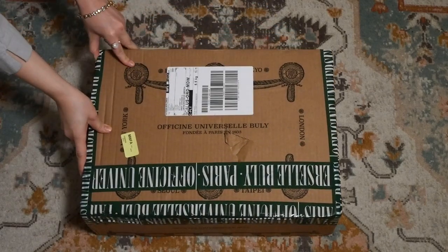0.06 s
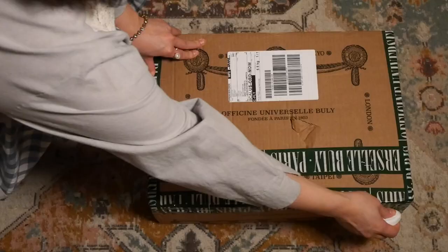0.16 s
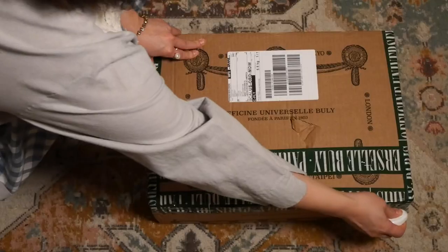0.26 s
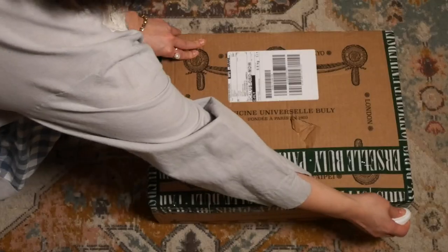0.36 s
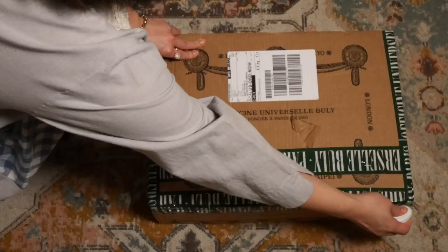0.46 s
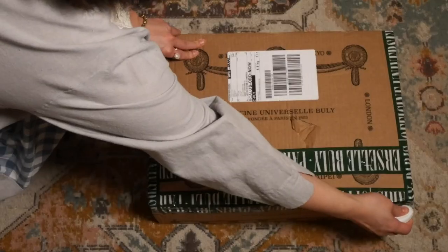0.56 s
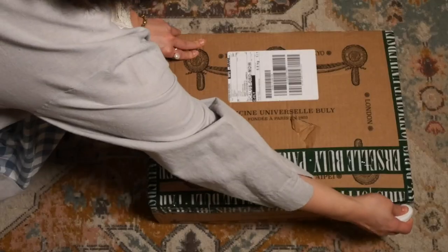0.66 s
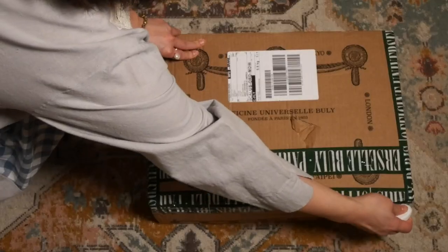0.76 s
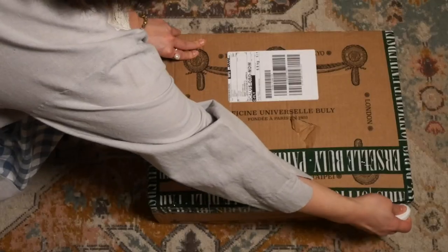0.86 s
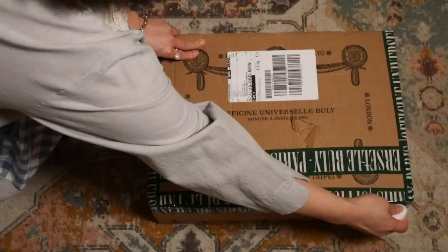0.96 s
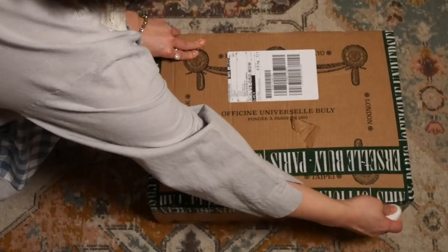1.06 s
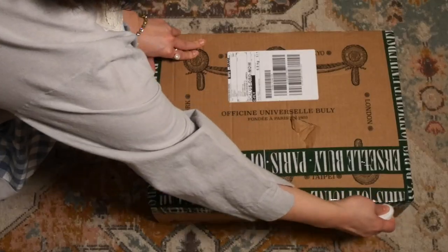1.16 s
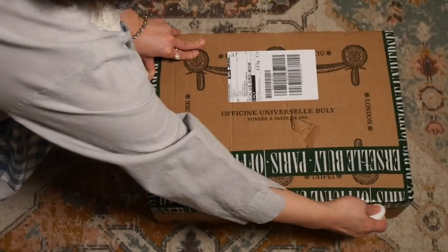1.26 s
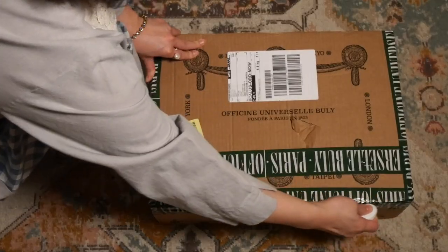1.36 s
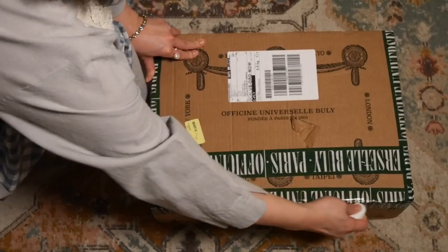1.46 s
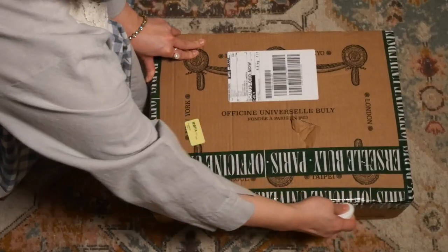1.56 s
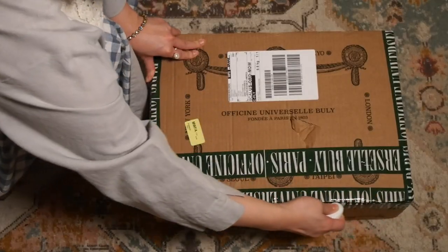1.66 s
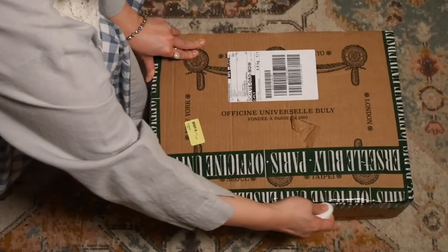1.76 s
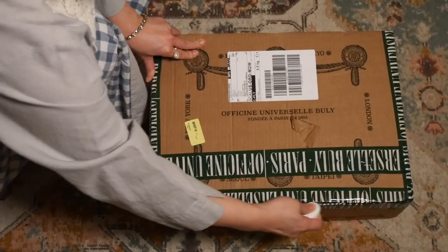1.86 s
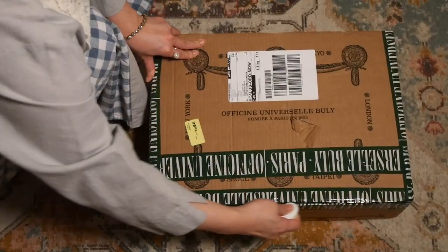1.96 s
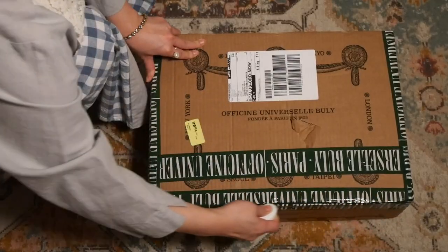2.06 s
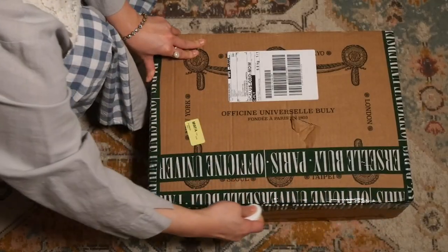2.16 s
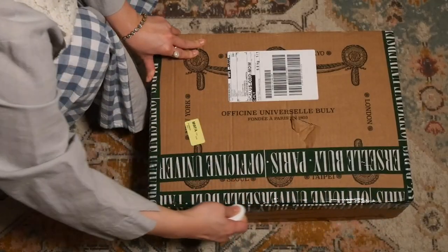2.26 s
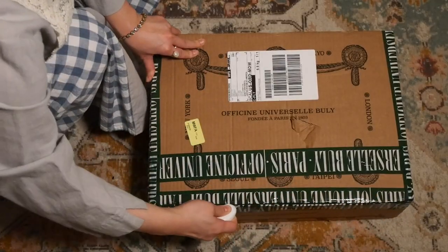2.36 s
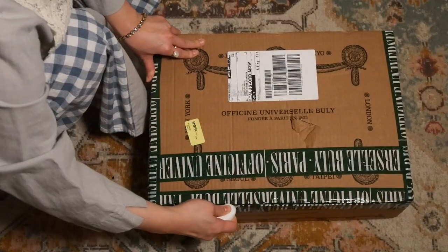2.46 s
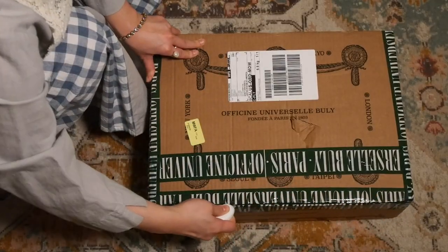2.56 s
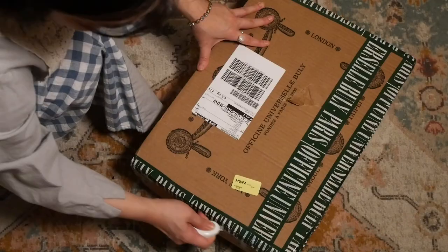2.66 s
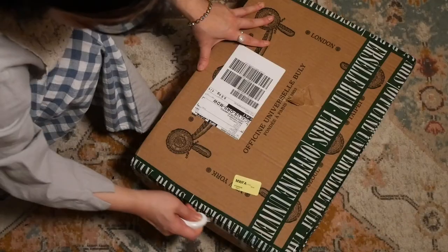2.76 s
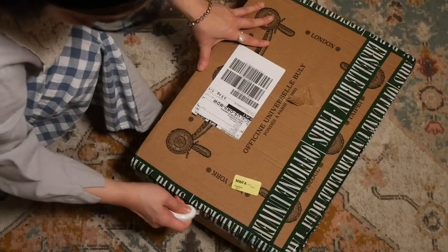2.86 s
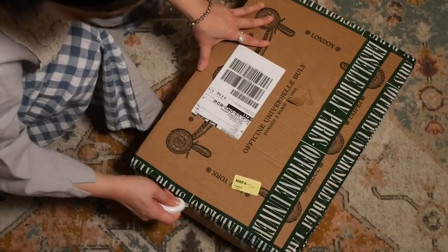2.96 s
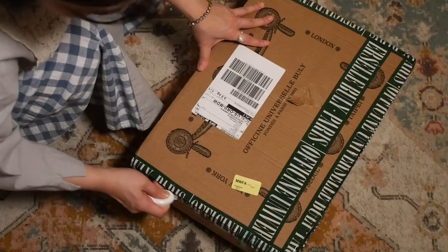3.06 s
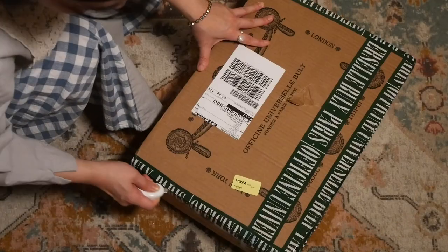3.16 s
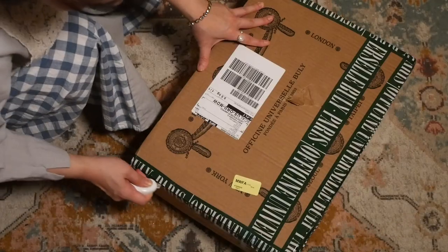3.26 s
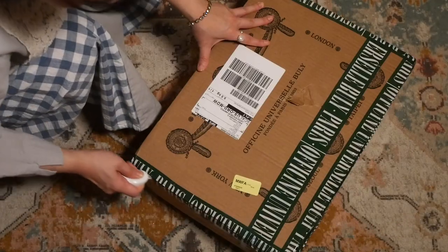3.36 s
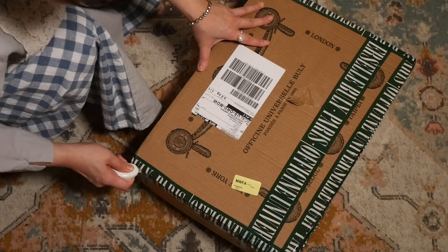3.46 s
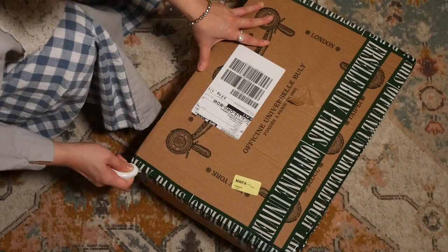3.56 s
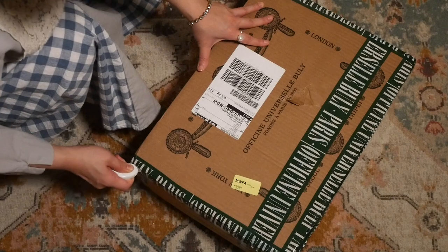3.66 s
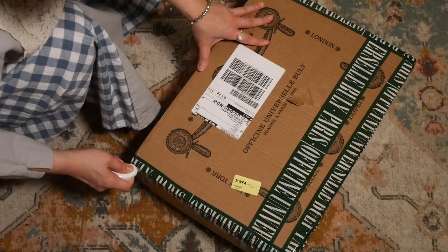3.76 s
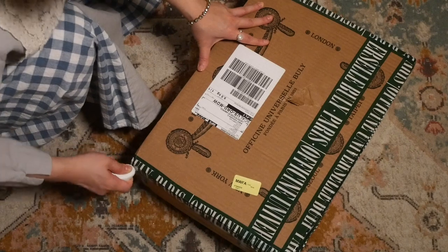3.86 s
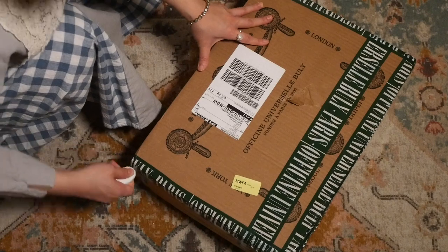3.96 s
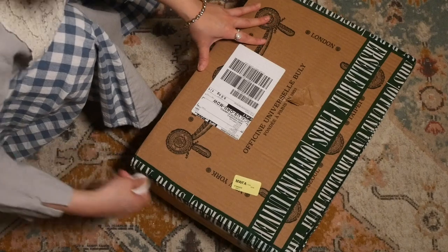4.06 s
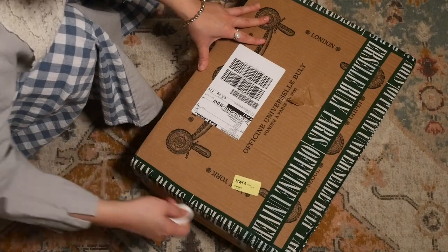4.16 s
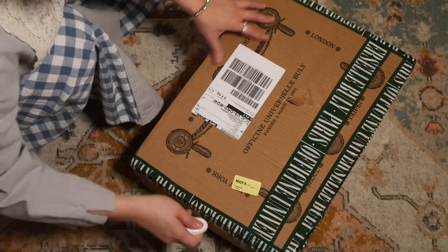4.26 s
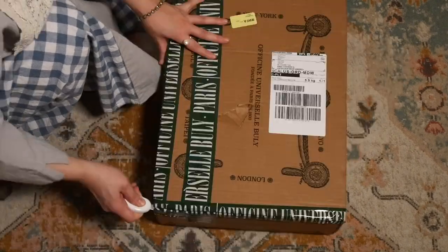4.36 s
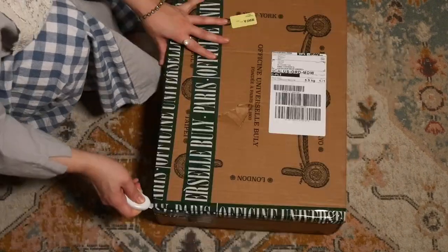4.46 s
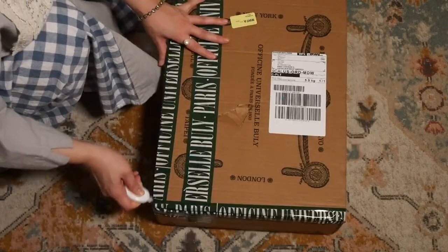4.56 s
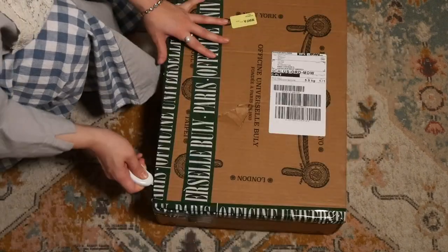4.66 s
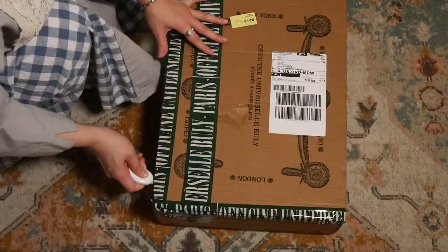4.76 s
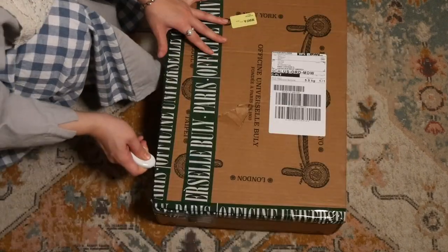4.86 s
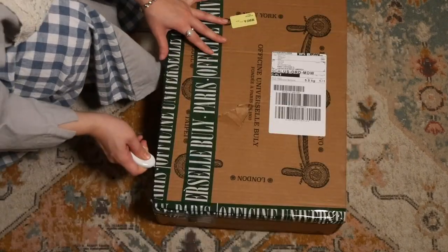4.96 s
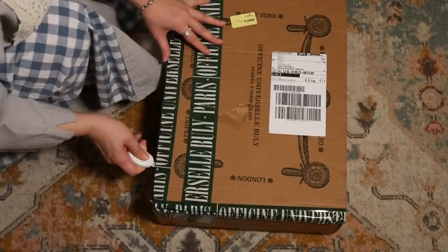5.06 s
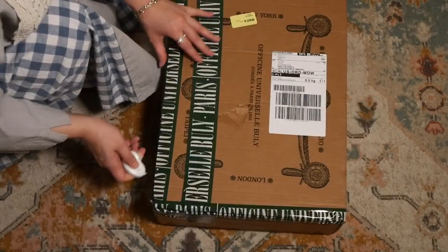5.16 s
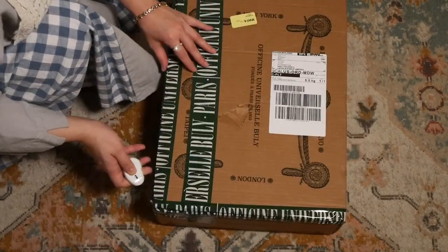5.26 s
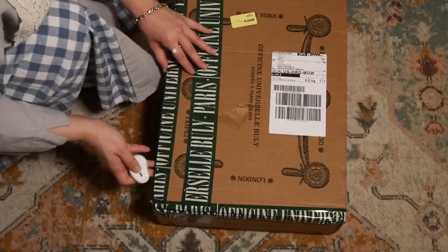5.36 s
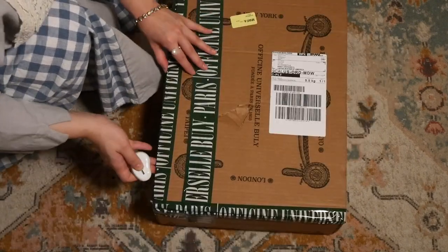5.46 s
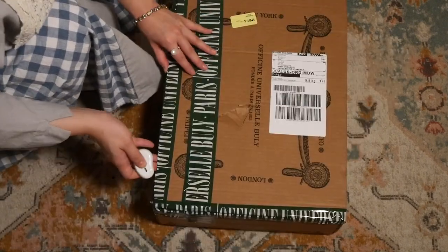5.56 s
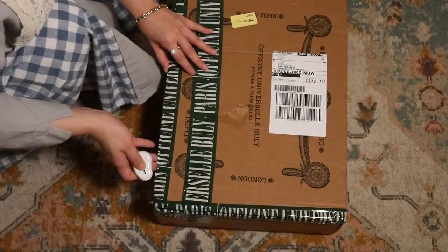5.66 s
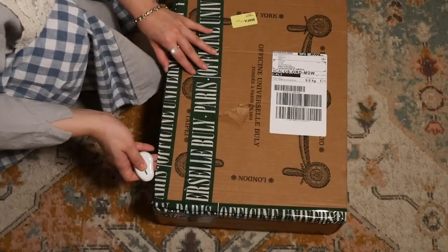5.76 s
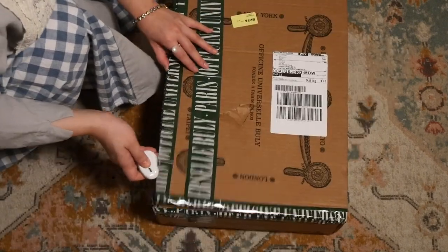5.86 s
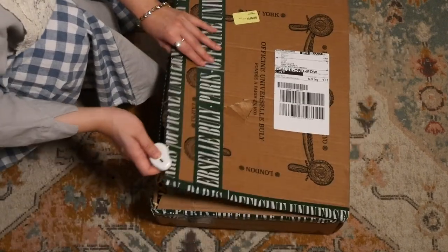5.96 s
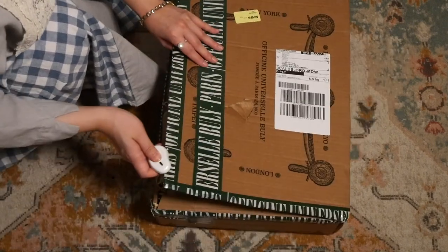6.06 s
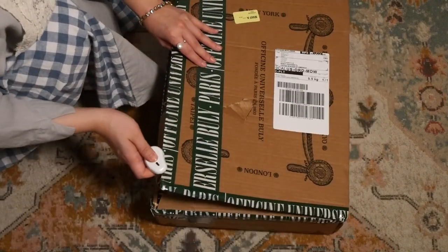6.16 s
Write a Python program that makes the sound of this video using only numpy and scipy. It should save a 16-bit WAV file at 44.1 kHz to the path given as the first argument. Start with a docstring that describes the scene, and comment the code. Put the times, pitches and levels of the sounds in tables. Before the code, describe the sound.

A small blade scrapes and rips along packing tape on a cardboard box, then the lid tears free with crunches and one loud knock.

```python
"""A small cutter slits the tape of a cardboard box in a room: broadband strokes, band-passed bursts, ringing modes.
Over a quiet hush, hands slide on the board, with a soft knock and scuffs. The blade scores and runs along the front
in dense random ticks, over flutes, with droning panels and ringing film; then the corner, one long side pull and
short pushes. A sharp rip and a brush lead to two slashes through the back tape and some probing.
The lid tears free with crunches and a loud knock, then squeaks as it lifts."""
import sys
import numpy as np
from scipy import signal
from scipy.fft import rfft, irfft
from scipy.io import wavfile
from scipy.ndimage import uniform_filter1d

SR = 44100
rng = np.random.default_rng(int(sys.argv[2]) if len(sys.argv) > 2 else 0)


def unload_audio(sound):
    """Save the sound as a 16-bit wav file, at the path given as the first command line argument."""
    columns = np.transpose(np.atleast_2d(sound))
    # keep every value between -1 and 1, then stretch to whole-number steps
    steps = np.round(np.clip(columns, -1, 1) * 32767)
    wavfile.write(sys.argv[1], SR, steps.astype(np.int16))


N = 274302
TIME_S = np.arange(N) / SR

# strokes by place: start t/s, attack/s, hold/s, panel rumble level/dB, tape rasp level/dB
SLIDING_STROKES = [(0.0, 0.0043, 0.0086, -61, -60), (0.19, .1, .06, -53, -72),
                   (0.36, 0.025, .25, -59.5, -73), (0.65, 0.013, .27, -56, -74),
                   (0.7, 0.021, 0.032, -58, -59.5), (6.122, 0.0044, 0.028, -54, -42.5),
                   (6.175, 0.0068, 0.03, -53, -55)]  # hands and board slide over each other
ENTRY_STROKES = [(0.943, 0.0076, 0.1, -51, -58), (1.02, 0.072, 0.042, -43.5, -51.5),
                 (1.13, 0.013, .16, -42, -45.5), (1.3, 0.041, .11, -44, -44.5)]  # blade scores its way into the front tape
FRONT_STROKES = [(1.45, 0.043, 0.013, -34.5, -37), (1.505, 0.025, 0.39, -40.5, -40.5),
                 (1.862, 0.018, 0.02, -33, -38.5), (1.935, 0.0028, 0.047, -35.5, -40),
                 (2.004, 0.0045, 0.023, -35, -36), (2.04, .015, 0.07, -47, -49)]  # along the front edge, then tugs at its end
CORNER_STROKES = [(2.136, 0.0069, 0.018, -43, -46.5), (2.203, 0.0029, 0.015, -40, -42.5),
                  (2.309, .03, 0.015, -46, -40.5), (2.35, 0.013, 0.045, -49.5, -53),
                  (2.56, 0.047, .022, -46, -46.5)]  # picks its way round the corner
SIDE_STROKES = [(2.657, 0.0046, 0.594, -38, -34)]  # one long pull down the side
SHORT_STROKES = [(3.27, 0.022, 0.023, -45, -45), (3.32, 0.0045, 0.15, -36.5, -38),
                 (3.347, 0.0042, 0.01, -30, -31.5), (3.435, 0.007, 0.0087, -37, -39),
                 (3.64, 0.0039, 0.17, -67, -64.5), (3.701, .003, 0.061, -54.5, -72),
                 (3.792, .01, 0.047, -46.5, -44), (3.87, 0.013, 0.12, -59, -57.5),
                 (3.954, 0.016, 0.0089, -40.5, -40.5), (4.02, .02, .08, -59.5, -67)]  # short pushes at the far end of the side
BRUSH_STROKES = [(4.228, 0.023, 0.076, -52.5, -50.5)]  # flat of the cutter brushes the tape
BACK_STROKES = [(4.477, 0.023, .045, -46, -61), (4.548, .002, 0.037, -39.5, -44),
                (4.582, 0.034, 0.058, -31, -33), (4.68, 0.0097, 0.031, -38.5, -51),
                (4.789, .004, 0.028, -36.5, -40), (4.825, 0.034, .006, -32.5, -37)]  # two slashes through the back tape, with lead-ins
PROBING_STROKES = [(5.02, 0.022, 0.074, -61, -63), (5.107, .005, .125, -54.5, -58),
                   (5.48, 0.047, .11, -55, -66), (5.625, 0.016, 0.15, -46, -58),
                   (5.765, 0.0021, 0.023, -37, -43), (5.797, 0.032, 0.042, -33.5, -37.5)]  # blade feels for the last tape and levers the lid
LID_STROKES = [(5.858, 0.0025, 0.012, -16.5, -23), (5.885, 0.013, .006, -19.5, -22.5),
               (5.91, .01, .02, -23.5, -29), (5.969, 0.0024, 0.0044, -24.5, -30),
               (5.987, 0.0046, 0.012, -24, -32.5), (6.02, 0.016, 0.061, -45, -53)]  # lid tears free in a run of crunches

# spectra by place: f/Hz, relative density level/dB per Hz
HUSH_COLOUR = [(15, -61), (25, -12), (64, -7), (92, -10.5), (175, -6.5), (206, -10.5), (384, -3),
               (545, -13.5), (624, 0), (796, -16), (1070, -8.5), (1440, -19), (1560, -16.5), (2280, -21),
               (16000, -25.5)]  # quiet background
SLIDING_COLOUR = [(45, -26), (70, -28), (118, 11), (199, -8), (330, 6.5), (520, -1), (872, -10),
                  (1050, -12), (1500, -27), (3040, -30), (4480, -29), (6000, -32), (16000, -37.5)]
ENTRY_COLOUR = [(45, -43), (80, -20), (120, 3), (190, -15), (310, 1), (580, -3.5), (800, -3), (1200, -9),
                (1600, -15), (2430, -17.5), (5750, -17.5), (7500, -12), (10000, -19.5), (16000, -29)]
FRONT_COLOUR = [(41, -39), (70, -27), (124, 0), (223, -5.5), (385, -3.5), (431, -13.5), (506, -5),
                (797, -8.5), (1050, -10), (1930, -17), (2540, -15.5), (5620, -17), (7060, -12),
                (13600, -18.5), (16000, -22.5)]
CORNER_COLOUR = [(41, -70), (70, -35), (115, -15), (170, 1), (223, -13), (394, -3), (483, -4), (977, -7),
                 (1120, -7.5), (1980, -16), (6300, -9), (13000, -23), (16000, -29)]
SIDE_COLOUR = [(41, -65), (70, -29), (166, -8), (233, -16.5), (274, -7), (422, -3), (517, 1.5), (579, -4),
               (620, -4), (1340, -6), (1980, -21), (6300, -14.5), (8470, -21.5), (13300, -20),
               (16000, -30.5)]
SHORT_COLOUR = [(41, -74), (70, -18), (155, -3), (336, -3), (462, 5.5), (892, -1), (977, -7.5),
                (1120, -5.5), (1280, -11), (1580, -13), (2270, -22.5), (4910, -15.5), (8090, -22.5),
                (13000, -23.5), (16000, -34)]
BRUSH_COLOUR = [(59, -69), (100, -43), (174, -10), (202, -19), (283, -13), (365, -8), (406, -16),
                (524, -15.5), (872, -6.5), (970, -17), (2220, -15), (12900, -14), (16000, -24)]
BACK_COLOUR = [(41, -74), (70, -41), (113, 1), (239, -5.5), (394, 3), (955, -6), (1410, -14), (1650, -18.5),
               (2910, -24), (4690, -23), (5370, -26), (6020, -18.5), (8470, -27.5), (13300, -31),
               (16000, -49)]
PROBING_COLOUR = [(41, -42), (70, -26), (159, -2), (218, -13.5), (293, -9.5), (403, -6), (554, -3.5),
                  (934, -11.5), (1370, -12), (1650, -24.5), (2840, -20), (12700, -30.5), (16000, -41)]
LID_COLOUR = [(30, -15), (76, -29), (120, -8), (170, 1.5), (220, -5), (300, -12), (420, -3.5), (560, -7),
              (680, -8.5), (1100, -10), (2200, -14), (4300, -13), (8000, -21.5), (16000, -29.5)]

# resonances on those spectra: f/Hz, width/Hz, lift/dB (negative = notch)
HUSH_PEAKS = [(630, 45, 2.5), (1010, 39, 2.9), (6450, 1200, 3.1)]
SLIDING_PEAKS = [(670, 88, 3.7), (1083, 210, 14.8), (2200, 170, 10), (4330, 430, 1.7)]
FRONT_PEAKS = [(197, 9.3, -2.5), (1106, 140, 4), (2025, 28, 7.5), (5770, 350, -7), (7800, 300, -3),
               (10030, 480, 2.5)]
SIDE_PEAKS = [(167, 24, 1.4), (524, 96, 0.65), (1270, 510, 0.78), (4050, 410, 2.6), (6100, 160, 1)]
SHORT_PEAKS = [(173, 38, 6.1), (1140, 140, 3.4), (3600, 350, 2), (6160, 210, 2.4)]
BACK_PEAKS = [(178, 34, 9.1), (351, 24, 2), (404, 23, 1.7), (4930, 400, 4.2), (5870, 260, 5.9)]
LID_PEAKS = [(680, 36, 0.99), (1410, 90, 1.4), (2900, 88, 5.3), (6240, 230, 5.5)]

# knocks on the box: t/s, dry peak level/dB, upper band edge f/Hz
KNOCKS = [(0.283, -34, 456), (1.940, -33, 910), (1.982, -35, 890), (2.006, -29, 700), (2.073, -32, 707),
          (2.206, -36.5, 810), (3.353, -26, 222), (4.584, -27.5, 1200), (4.655, -25, 500),
          (4.864, -21, 540), (5.767, -26, 400), (5.860, -19.5, 980), (5.870, -10.5, 800), (5.896, -1, 900),
          (5.900, -10, 595), (5.971, -14, 910)]
# ringing modes of the box: f/Hz, width/Hz before the damping factor, mean relative level/dB
BOX_MODES = [(123.5, 6.6, -21), (170.2, 5.9, -13), (220, 24, -38), (273.5, 10.3, -1.5), (307, 45, 0),
             (388.5, 8.9, 0), (426, 130, 2.5), (522, 17, -2), (641, 21.5, 2), (677, 46, 7.5), (970, 39, 4),
             (977, 58, 0), (1358, 22, 4.5)]
# longer rips and scuffs of tape: t/s, dry peak level/dB, pitch f/Hz, crumbling time constant/s
RIPS = [(0.353, -47.5, 3020, 0.021), (0.711, -41, 4700, 0.0068), (0.806, -44, 4330, 0.0052),
        (1.883, -25, 2440, 0.018), (4.148, -36, 4640, 0.014), (4.154, -15.5, 6570, .0065),
        (4.160, -23, 8400, .013), (4.635, -22, 4660, 0.018), (5.297, -40.5, 3200, 0.0078),
        (5.922, -10, 3000, 0.0055), (5.991, -12.5, 1410, 0.0026)]
# clean snaps and blade ticks: t/s, dry peak level/dB, pitch f/Hz
SNAPS = [(0.951, -43, 4030), (0.977, -36.5, 4380), (1.207, -27.5, 6960), (1.941, -21, 5260),
         (2.007, -14, 8900), (2.021, -16.5, 6700), (2.144, -27.5, 9300), (2.207, -26, 6140),
         (2.335, -25.5, 5260), (2.369, -28, 4300), (2.659, -37, 1520), (3.352, -29, 4600),
         (3.957, -18.5, 5630), (4.55, -29.5, 2560), (4.585, -22, 4770), (4.863, -18, 5900),
         (5.11, -36, 3200), (5.175, -33.5, 4600), (5.526, -36, 7100), (5.65, -33.5, 2340),
         (5.768, -26, 7650), (5.861, -17, 3340), (5.87, -7.5, 5200), (5.888, -7.5, 6100), (5.896, -8, 3160),
         (5.971, -16, 3560), (6.124, -36, 5100)]

# gliding resonances: start t/s, rise/s, fall/s, start f/Hz, end f/Hz, width/Hz, crest level/dB
FILM_RINGS = [(0.96, 0.28, 0.23, 3960, 3610, 240, -50.5), (1.48, 0.062, .4, 3240, 2700, 180, -50),
              (0.95, 0.55, 0.43, 6870, 6980, 740, -47), (2.66, 0.31, 0.32, 6250, 6070, 700, -48),
              (3.02, 0.21, 0.21, 5500, 4850, 480, -42), (4.56, .11, 0.044, 5890, 6400, 900, -39.5),
              (4.79, .008, 0.087, 6020, 6230, 800, -43)]  # taut film
PANEL_DRONES = [(1.04, 0.23, 0.076, 119.7, 124, 16, -50), (1.28, .14, .14, 148, 134, 28, -43),
                (1.48, .26, .24, 132, 114, 26, -42), (2.66, .02, 0.078, 520, 511, 95, -37.5),
                (2.76, .16, 0.16, 515, 522, 66, -38), (3.12, 0.077, 0.12, 176.3, 164, 42, -42.5)]  # cardboard panels
LID_SQUEAKS = [(6.125, .012, .013, 997, 1050, 150, -43), (6.15, 0.0124, 0.025, 1075, 1057, 150, -40)]  # lid as it lifts

# reverberation of the room: f/Hz, t60/s
ROOM_T60 = [(150, 0.27), (700, 0.2), (2500, 0.19), (6000, 0.19), (14000, 0.24)]

HUSH_RMS_DB = -60
PANEL_EDGE_HZ, CUTOFF_HZ = 1500, 15900
EASE_DB_PER_S, RELEASE_DB_PER_S = 4, 461
SNAP_CRUMBLE_S = 0.002
RING_EDGE_DB = 23  # both ends of a resonance lie this far below its crest
FLUTES_FROM_S, FLUTES_TO_S = 1.487, 1.865
FLUTES_START_PER_S, FLUTES_SLOWING_PER_S2, FLUTE_SWELL_DB = 33.2, 28, 3
RIDGE_DB, RIDGE_SPREAD_DB = -28, 0.5
RIDGE_HZ, RIDGE_SPREAD_OCTAVES, RIDGE_CRUMBLE_S = 3460, 0.6, 0.0038


def from_db(db):
    """Decibels to gain."""
    return 10 ** (np.asarray(db) / 20)


def rms_one(x):
    """Scale to unit power."""
    return x / np.sqrt(np.mean(x ** 2) + 1e-20)


def at_hz(points, hz):
    """Interpolate a table on a log-frequency axis."""
    freq_hz, value = np.transpose(points)
    return np.interp(np.log(np.maximum(hz, 1)), np.log(freq_hz), value)


def butter(x, hz, kind, order=2):
    """Causal low-, high- or band-pass."""
    sos = signal.butter(order, np.minimum(hz, SR / 2 - 1), kind, fs=SR, output="sos")
    return signal.sosfilt(sos, x)


def add(out, start_s, sound):
    """Mix a sound in at its start time."""
    start = max(round(start_s * SR), 0)
    out[start:start + len(sound)] += sound[:max(N - start, 0)]


def drift(knots_per_s, size):
    """Slow random curve of about unit spread, linear between random knots."""
    knots = rng.standard_normal(N // 20)
    position = np.arange(size) * knots_per_s / SR
    return np.interp(position, np.arange(len(knots)), knots) * np.sqrt(3 / 2)


def response(colour, peaks, size=4096):
    """Minimum-phase impulse response of a broad spectrum with resonances on it."""
    hz = np.arange(size // 2 + 1) * SR / size
    db = at_hz(colour, hz)
    for centre_hz, width_hz, lift_db in peaks:
        db = db + lift_db / (1 + (2 * (hz - centre_hz) / width_hz) ** 2)
    # folding the cepstrum makes the response causal
    cepstrum = irfft(np.log(from_db(db)))[:size // 2]
    cepstrum[1:] *= 2
    return irfft(np.exp(rfft(cepstrum, size)))


def background_hush():
    """Steady quiet noise, coloured by its spectrum."""
    noise = rng.standard_normal(N)
    hush = signal.fftconvolve(noise, response(HUSH_COLOUR, HUSH_PEAKS))[:N]
    return from_db(HUSH_RMS_DB) * rms_one(hush)


def pressure(attack_s, hold_s):
    """Gain of one stroke: linear rise, hold while the hand slowly eases, quick release."""
    t = TIME_S[:int((attack_s + hold_s + 60 / RELEASE_DB_PER_S) * SR)]
    release_db = RELEASE_DB_PER_S * np.maximum(t - attack_s - hold_s, 0)
    rise = np.minimum(t / max(attack_s, 1 / SR), 1)
    return rise * from_db(-EASE_DB_PER_S * t - release_db)


def fibre_breaks(size, per_s, spread_db, friction):
    """Random ticks of uneven size, as fibres break, over smooth friction noise; unit power."""
    breaks = (rng.random(size) < per_s / SR) * rng.choice([-1, 1], size)
    sizes = from_db(spread_db * np.minimum(rng.exponential(1, size), 4))
    return rms_one(rms_one(breaks * sizes) + friction * rng.standard_normal(size))


def strokes(table, colour, peaks, per_s, spread_db, friction, judder_db, swell_db=0 * TIME_S):
    """The same juddering breaks shake the panels (lows) and rasp in the tape (highs)."""
    out = np.zeros(N)
    ring = response(colour, peaks)
    panel, tape = [butter(ring, PANEL_EDGE_HZ, kind, order=5) for kind in ("low", "high")]
    for start_s, attack_s, hold_s, rumble_db, rasp_db in table:
        pressed = pressure(attack_s, hold_s)
        grip = from_db(judder_db * drift(127.0, SR))
        grain = fibre_breaks(SR, per_s, spread_db, friction) * grip
        force = pressed * rms_one(grain[:len(pressed)])
        rasp_db = rasp_db + np.interp(start_s + TIME_S[:len(pressed)], TIME_S, swell_db)
        for part, db in ((panel, rumble_db), (tape, rasp_db)):
            add(out, start_s, signal.fftconvolve(force * from_db(db), part / np.linalg.norm(part)))
    return out


def hand_sliding():
    """Mostly smooth friction of hands and board, before and after the cutting."""
    return strokes(SLIDING_STROKES, SLIDING_COLOUR, SLIDING_PEAKS,
                   per_s=1300, spread_db=-1.0, friction=0.94, judder_db=-2.0)


def knocks(damping, thud, thud_s, lowest_hz):
    """A blow rings all box modes over a short dull thud; soft contacts lose the upper modes."""
    out, t = np.zeros(N), TIME_S[:SR // 3]
    hz, width_hz, mode_db = np.transpose(BOX_MODES)[:, :, None]
    for start_s, db, bright_hz in KNOCKS:
        strength = from_db(mode_db + rng.normal(0, 0.55, hz.shape)) * rng.choice([-1, 1], hz.shape)
        decay = np.exp(-np.pi * damping * width_hz * t)
        ring = np.sum(strength * np.sin(2 * np.pi * hz * t) * decay, axis=0)
        push = rms_one(butter(rng.standard_normal(len(t)), [250, 900], "band")) * np.exp(-t / thud_s)
        # a small box radiates almost nothing below its lowest mode
        knock = butter(ring + thud * push, [lowest_hz, bright_hz], "band", order=3)
        add(out, start_s, from_db(db) * knock / np.abs(knock).max())
    return out


def snaps(breadth, crack):
    """Taut film gives way with one hard break, then crumbles for milliseconds around its own pitch."""
    out, t = np.zeros(N), TIME_S[:SR // 15]
    clean = [(*snap, SNAP_CRUMBLE_S) for snap in SNAPS]
    for start_s, db, hz, crumble_s in clean + list(RIPS) + ridge_crackles():
        crumbling = rng.standard_normal(len(t)) * np.exp(-t / crumble_s)
        hard_break = 2 * rng.standard_normal(len(t)) * np.exp(-t / 0.00028)
        burst = crumbling + hard_break
        film = butter(burst, [hz / (1 + breadth), hz * (1 + breadth)], "band")
        snap = film + crack * butter(burst, [hz / 3, hz * 3], "band", order=1)
        add(out, start_s, from_db(db) * snap / np.abs(snap).max())
    return out


def cutting():
    """Every pass of the blade, each with the grain of its place on the box."""
    swell_db, _ = flutes()
    entry = strokes(ENTRY_STROKES, ENTRY_COLOUR, FRONT_PEAKS,
                    per_s=1700, spread_db=2.5, friction=0.44, judder_db=1.95)
    front = strokes(FRONT_STROKES, FRONT_COLOUR, FRONT_PEAKS,
                    per_s=900, spread_db=0.5, friction=0.94, judder_db=2.86, swell_db=swell_db)
    corner = strokes(CORNER_STROKES, CORNER_COLOUR, FRONT_PEAKS,
                     per_s=990, spread_db=2.5, friction=0.4, judder_db=0.0)
    side = strokes(SIDE_STROKES, SIDE_COLOUR, SIDE_PEAKS,
                   per_s=2200, spread_db=1.0, friction=0.58, judder_db=0.3)
    short = strokes(SHORT_STROKES, SHORT_COLOUR, SHORT_PEAKS,
                    per_s=2000, spread_db=2, friction=0.81, judder_db=1.5)
    brush = strokes(BRUSH_STROKES, BRUSH_COLOUR, [],
                    per_s=2000, spread_db=0.0, friction=1, judder_db=2.0)
    back = strokes(BACK_STROKES, BACK_COLOUR, BACK_PEAKS,
                   per_s=1100, spread_db=2.5, friction=0.65, judder_db=2.1)
    probing = strokes(PROBING_STROKES, PROBING_COLOUR, LID_PEAKS,
                      per_s=2500, spread_db=3, friction=0.64, judder_db=2.5)
    return entry + front + corner + side + short + brush + back + probing


def resonances(table):
    """Narrow noise-shaken resonances that swell, glide evenly in pitch and fade."""
    out = np.zeros(N)
    for start_s, rise_s, fall_s, start_hz, end_hz, width_hz, db in table:
        t = TIME_S[:int((rise_s + fall_s) * SR)]
        phase = 2 * np.pi * np.cumsum(np.linspace(start_hz, end_hz, len(t))) / SR
        # the tail of a longer noise leaves the filter settled
        shaken = butter(rng.standard_normal((2, 2 * SR)), width_hz / 2, "low")[:, -len(t):]
        ringing = rms_one(shaken[0] * np.cos(phase) + shaken[1] * np.sin(phase))
        below_crest = np.interp(t, [0, rise_s, rise_s + fall_s], [1, 0, 1])
        swell = from_db(db - RING_EDGE_DB * below_crest)
        add(out, start_s, ringing * uniform_filter1d(swell, size=200, mode="constant"))
    return out


def singing():
    """Taut film rings, swelling over the flutes; panels drone; the lid squeaks as it lifts."""
    swell_db, _ = flutes()
    film = from_db(swell_db) * resonances(FILM_RINGS)
    return film + resonances(PANEL_DRONES) + resonances(LID_SQUEAKS)


def flutes():
    """The blade slows over the corrugation, biting at each ridge: swell (dB), ridge times (s)."""
    t = np.clip(TIME_S, FLUTES_FROM_S, FLUTES_TO_S) - FLUTES_FROM_S
    crossed = FLUTES_START_PER_S * t - FLUTES_SLOWING_PER_S2 * t ** 2 / 2
    on_flutes = (TIME_S > FLUTES_FROM_S) * (TIME_S < FLUTES_TO_S)
    swell_db = FLUTE_SWELL_DB * np.cos(2 * np.pi * crossed) * on_flutes
    return swell_db, TIME_S[1:][np.diff(np.floor(crossed)) > 0]


def ridge_crackles():
    """One small rip per ridge, strength and pitch random; rows as in RIPS."""
    _, times_s = flutes()
    chance = np.clip(rng.standard_normal((len(times_s), 2)), -2, 2)
    rows = []
    for start_s, (strength, pitch) in zip(times_s, chance):
        db = RIDGE_DB + RIDGE_SPREAD_DB * strength
        hz = RIDGE_HZ * 2 ** (RIDGE_SPREAD_OCTAVES * pitch)
        rows.append((start_s, db, hz, RIDGE_CRUMBLE_S))
    return rows


def lid_tear():
    """Crunches of dense uneven breaks with little friction as the lid tears free."""
    return strokes(LID_STROKES, LID_COLOUR, LID_PEAKS,
                   per_s=1100, spread_db=2.5, friction=0.26, judder_db=1.7)


def room(x, wet_db, first_echo_s):
    """Scattered reflections start after a few milliseconds and die away band by band."""
    t, tail = TIME_S[:SR // 2], 0
    edges_hz = np.geomspace(100, 18000, 9)
    for low_hz, high_hz in zip(edges_hz, edges_hz[1:]):
        band = butter(rng.standard_normal(len(t)), [low_hz, high_hz], "band")
        t60_s = at_hz(ROOM_T60, np.sqrt(low_hz * high_hz))
        tail = tail + band * np.exp(-np.log(1000) * t / t60_s)
    # lows stay mostly direct
    tail = butter(tail * (t > first_echo_s), 320, "high", order=1)
    return x + from_db(wet_db) * signal.fftconvolve(x, tail / np.linalg.norm(tail))[:N]


def stereo_smear(mid):
    """A faint short noise smear of the sound, opposite in the two channels."""
    smear = rng.standard_normal(SR // 80)
    side = from_db(-34.5) * signal.fftconvolve(mid, smear / np.linalg.norm(smear))[:N]
    return np.array([mid + side, mid - side])


def scene():
    """All box sounds in the room over the hush, nearly the same in both ears."""
    rubbing = hand_sliding() + cutting() + lid_tear()
    blows = knocks(damping=1.53, thud=0.88, thud_s=0.006, lowest_hz=111) + snaps(breadth=0.24, crack=0.38)
    box = rubbing + blows + singing()
    mid = room(box, wet_db=-6.5, first_echo_s=0.0045) + background_hush()
    return stereo_smear(mid)


def record(dry):
    """Clip peaks at full scale, then low-pass the top."""
    low_pass = signal.firwin(301, CUTOFF_HZ, fs=SR)
    return signal.fftconvolve(np.clip(dry, -1, 1), low_pass[None], "same", axes=1)


dry = scene()
out = record(dry)
unload_audio(out)
```